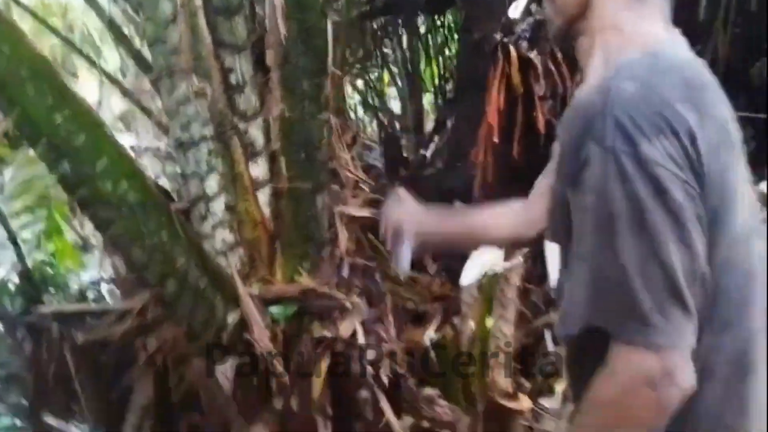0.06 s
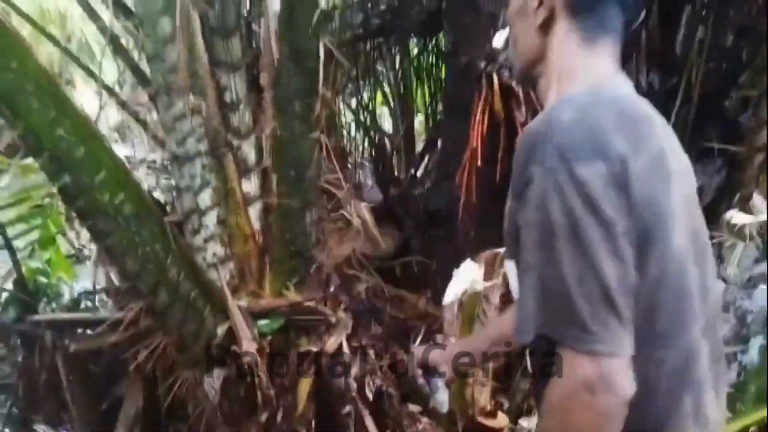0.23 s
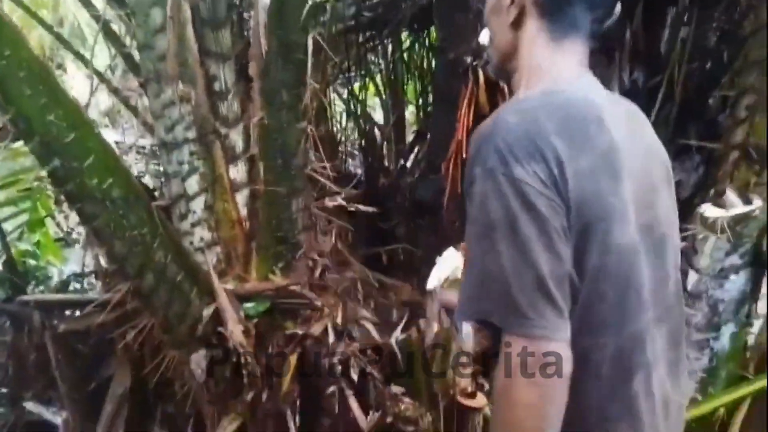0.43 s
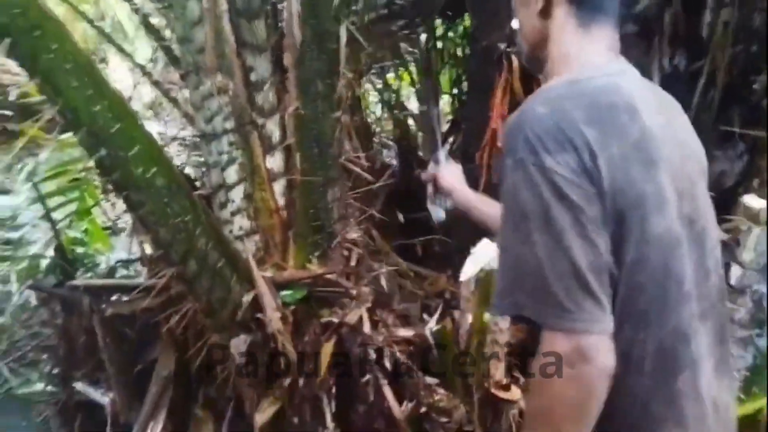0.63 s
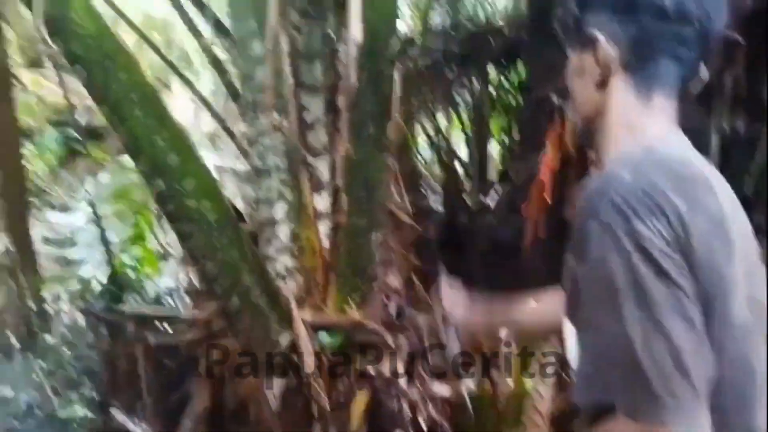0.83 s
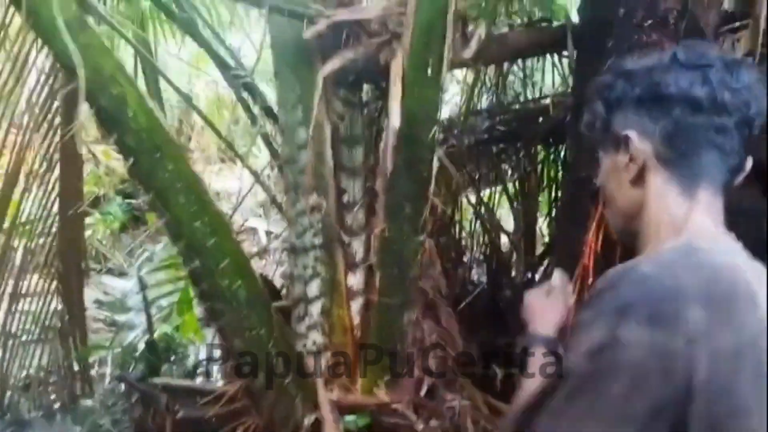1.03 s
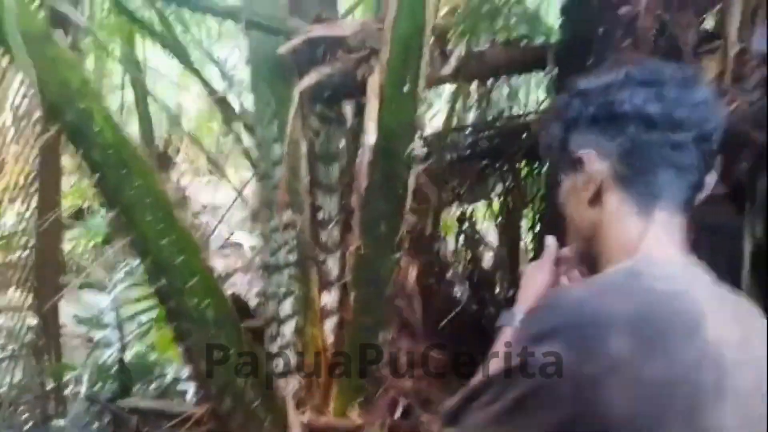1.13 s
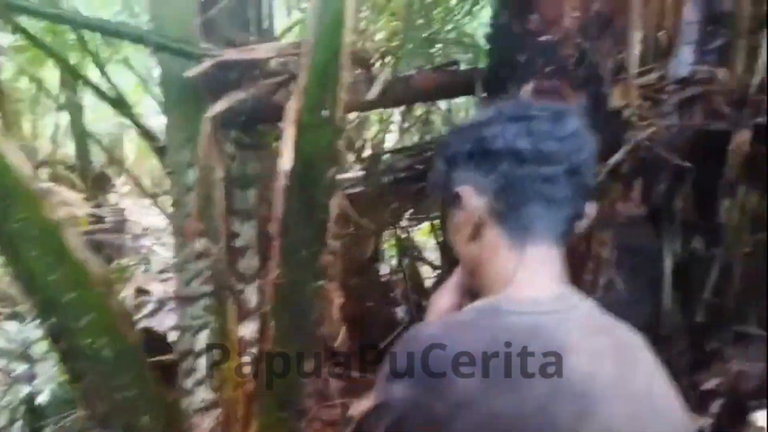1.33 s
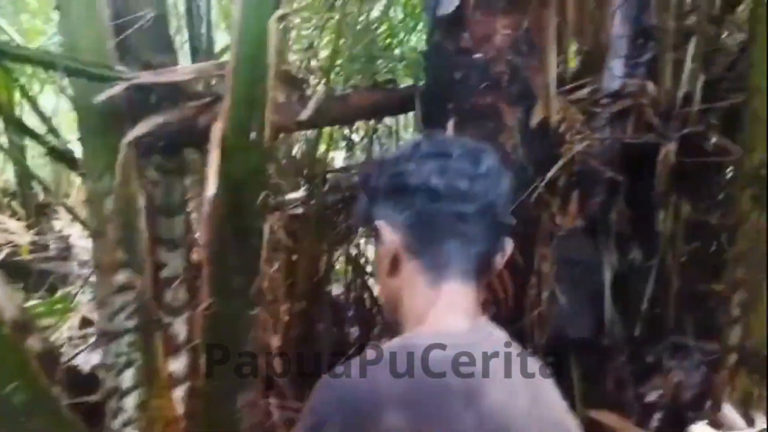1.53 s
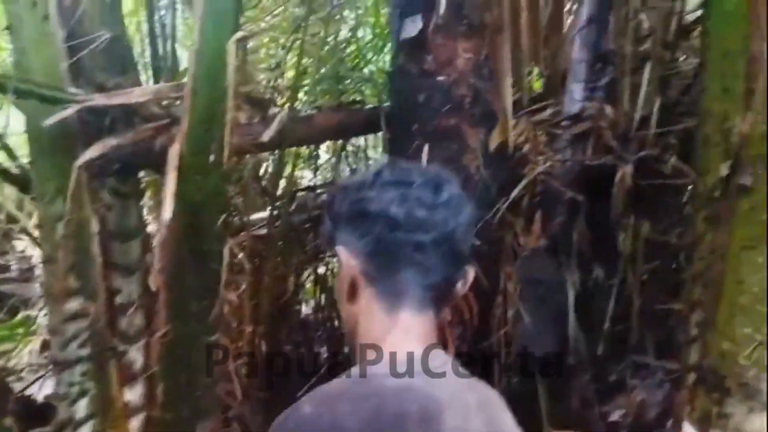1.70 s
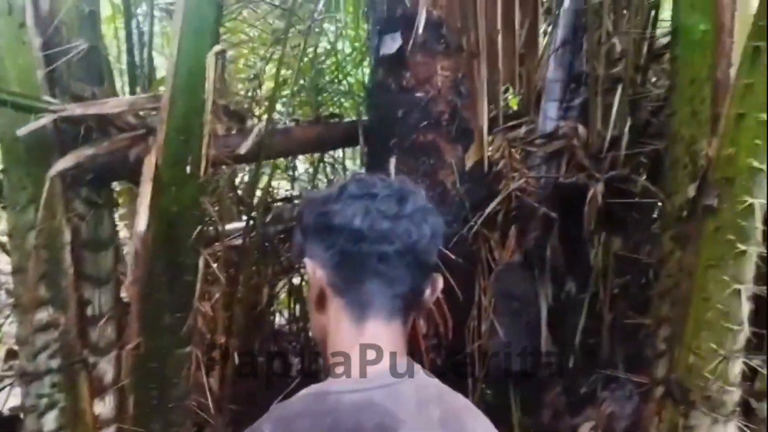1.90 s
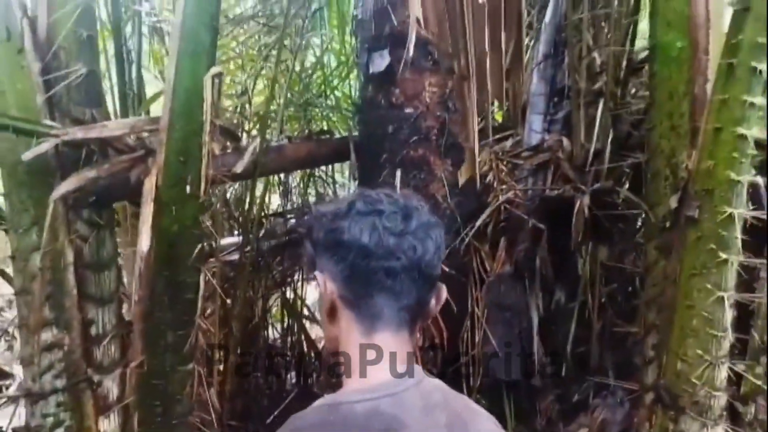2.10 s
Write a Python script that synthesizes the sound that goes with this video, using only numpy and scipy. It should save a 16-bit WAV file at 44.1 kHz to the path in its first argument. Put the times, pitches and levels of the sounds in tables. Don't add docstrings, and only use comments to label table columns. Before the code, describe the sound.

Machete chopping irregularly into a fibrous palm base, with sharp splintery cracks and hollow knocks outdoors

```python
import sys
import numpy as np
from scipy import signal
from scipy.fft import rfft, irfft, next_fast_len
from scipy.io import wavfile
from scipy.ndimage import uniform_filter1d

SR = 44100
rng = np.random.default_rng(int(sys.argv[2]) if len(sys.argv) > 2 else 0)


def int16_out(signal):
    q = np.round(np.clip(np.atleast_2d(signal).T, -1, 1) * 32767)
    wavfile.write(sys.argv[1], SR, q.astype(np.int16))


def gain_from_decibels(decibels):
    exponent = np.asarray(decibels, float) / 20
    return 10 ** exponent


N = 94815


def level(x):
    return x / np.sqrt(np.mean(x ** 2))


def shape(points, size):
    p = np.array(points, float)
    hz = np.arange(size // 2 + 1) * SR / size
    return np.interp(np.log(hz + 1), np.log(p[:, 0]), p[:, 1])


def colour(x, points):
    cepstrum = irfft(shape(points, size=4096) * np.log(10) / 20)
    cepstrum[1:2048] *= 2
    cepstrum[2049:] = 0
    return signal.fftconvolve(x, irfft(np.exp(rfft(cepstrum))))[:N]


def ring(x, hz, width_hz):
    hz = min(hz, 0.45 * SR)
    b, a = signal.iirpeak(hz, hz / width_hz, fs=SR)
    return signal.lfilter(b, a, x)


def fade(t, t60):
    return gain_from_decibels(-60 * np.maximum(t, 0) / max(t60, 0.003))


def add(out, at, x):
    i = int(at * SR)
    out[i:i + len(x)] += x[:N - i]


def walk(rate):
    hold = int(SR / rate)
    steps = np.repeat(rng.standard_normal(N // hold + 1), hold)
    return 1.26 * uniform_filter1d(uniform_filter1d(steps, hold), hold)[:N]


STREAK_DB = 6.5


def crackle(spread_db, patchy_db, mottle_db, size):
    click_db = spread_db * rng.exponential(size=N) + patchy_db * walk(300)
    x = rng.standard_normal(N) * gain_from_decibels(click_db)
    for frame, db in ((4 * size, STREAK_DB), (size, mottle_db)):
        hz, _, z = signal.stft(x, SR, nperseg=frame)
        field = uniform_filter1d(rng.standard_normal(z.shape), size=2, axis=1)
        field = uniform_filter1d(field, size=2, axis=0)
        treble = np.clip(hz / 5000, 0.4, 1)[:, None]
        z = z * gain_from_decibels(db * treble * field / field.std())
        x = signal.istft(z, nperseg=frame)[1][:N]
    return level(x)


# frequency [Hz], density [dB per Hz].
FOREST_COLOUR = [(15, -62), (25, 17.5), (277, 7.5), (1480, -4), (3430, 0.5), (5570, -5.5), (6560, -1.5),
                 (12200, -7.5), (16000, -13)]
FOREST_DB = -53


def forest():
    hush = level(colour(crackle(0.11, 0.4, 2.7, size=256), FOREST_COLOUR))
    return hush * gain_from_decibels(FOREST_DB - 3 + 1.1 * walk(12.1))


# time [s], level [dB], brightness [dB].
RUSTLE_COURSE = [(0, -40, -5), (0.039, -46, -4.5), (0.171, -52, -0.5), (0.201, -48, 11), (.45, -48.5, -0.5),
                 (.62, -42.5, -1), (.72, -45.5, -3.5), (.82, -59.5, -5), (.9, -49.5, 8), (.96, -52, 7.5),
                 (1.22, -53.5, -29), (1.3, -53.5, 2.5), (1.47, -55, 7), (1.598, -61, 3),
                 (1.651, -46.5, 0.5), (1.74, -76, 5), (1.95, -51.5, -3), (2.079, -60.5, -11)]
# frequency [Hz], density [dB per Hz].
LEAF_COLOUR = [(59, -45), (100, -54), (239, -8.5), (736, 0), (3470, 1), (5900, -15), (6560, -8.5),
               (14700, -9.5), (16000, -14.5)]
LEAF_DB = 1


def leaves():
    time, stir_db, bright_db = np.array(RUSTLE_COURSE).T
    t = np.arange(N) / SR
    x = level(colour(crackle(1.0, 1.36, 2.4, size=256), LEAF_COLOUR))
    tilt_db = np.interp(t, time, bright_db)

    def part(hz, kind):
        sos = signal.butter(3, hz, kind, fs=SR, output="sos")
        return signal.sosfilt(sos, x) * gain_from_decibels(1.32 * walk(30.37))

    woody = part(880, "low") * gain_from_decibels(1 - 0.32 * tilt_db)
    dull = part([1300, 5000], "band")
    bright = part(5030, "high") * gain_from_decibels(tilt_db)
    return (woody + dull + bright) * gain_from_decibels(LEAF_DB + np.interp(t, time, stir_db))


# start [s], peak level [dB], pitch [Hz], t60 [s].
SNAP_EVENTS = [(0.1893, -19, 12000, .012), (0.2103, -6.5, 10150, 0.008), (.241, -5.5, 8700, 0.02),
               (.246, -4.5, 8700, 0.034), (.290, -10.5, 4930, 0.016), (0.2953, -15, 6540, 0.012),
               (.3765, -9, 11800, 0.013), (0.3817, -6, 13000, 0.0097), (0.398, 0, 8260, 0.0054),
               (0.4016, -10.5, 7100, .015), (0.4013, -13, 9450, 0.0073), (0.4047, -15, 8750, 0.016),
               (.470, -26, 2940, 0.042), (0.614, -29.5, 3370, 0.057), (0.6754, -24, 1780, 0.081),
               (0.6956, -24, 1660, 0.034), (0.8457, -32.5, 8000, .012), (0.8846, -23, 3290, 0.029),
               (1.045, -8.5, 9000, 0.0086), (0.9717, -19, 11500, 0.011), (1.011, -7.5, 10000, 0.036),
               (1.2715, -31.5, 2360, 0.019), (1.324, -36.5, 3500, 0.084), (1.39, -29.5, 10800, 0.069),
               (1.651, -30.5, 2450, 0.028), (1.752, -32.5, 2850, 0.014), (1.779, -12.5, 2540, 0.016),
               (1.788, -3, 10500, 0.008), (2.089, -34, 5900, 0.027), (.462, -26, 2970, .03),
               (.495, -32, 3040, 0.011), (.528, -34.5, 3470, 0.011), (.73, -32, 2030, 0.025),
               (.846, -33.5, 1800, 0.014), (.858, -33.5, 3600, 0.058), (.891, -21.5, 3360, 0.026),
               (.8965, -28, 13000, .01), (.918, -28, 11000, .008), (.9235, -25, 5800, 0.027),
               (.959, -28, 2730, 0.02), (.9894, -12, 12000, .012), (.9905, -25, 2230, 0.0073),
               (1.46, -31, 6360, 0.013), (1.509, -38, 9600, 0.013), (1.518, -40, 2600, 0.035),
               (1.625, -40, 2870, .03), (1.159, -22.5, 2200, .04), (1.166, -18, 2000, .025),
               (2.134, -28.5, 4840, .02), (2.122, -35, 6000, .012)]
SNAP_DB, SNAP_ATTACK_S = -4.5, 0.00056
SNAP_WIDTH = 0.46


def snaps():
    out, t = np.zeros(N), np.arange(SR // 10) / SR
    for at, db, hz, t60 in SNAP_EVENTS:
        attack = np.minimum(t / SNAP_ATTACK_S, 1)
        burst = rng.standard_normal(len(t)) * attack * fade(t, t60)
        x = ring(ring(burst, hz, SNAP_WIDTH * hz), hz, SNAP_WIDTH * hz)
        add(out, at, gain_from_decibels(db + SNAP_DB) * x / np.abs(x).max())
    return out


# start [s], peak level [dB], hold [s], t60 [s].
CUT_EVENTS = [(0.191, -23.5, 0.0017, 0.067), (0.2089, -12, 0.023, 0.18), (0.233, -7.5, 0.005, 0.29),
              (0.282, -12.5, 0.0075, 0.039), (0.371, -15.5, 0.0021, 0.15), (0.393, -18, 0.0029, 0.33),
              (.885, -35, 0.0032, 0.048), (0.916, -31.5, 0.006, 0.052), (0.973, -23.5, 0.0019, 0.026),
              (0.9913, -16.5, .011, 0.22), (.981, -25.5, 0.0076, .05), (.8155, -32, .003, 0.027),
              (0.845, -31, .003, .03), (.8965, -32, 0.0026, .03), (1.75, -35, 0.0027, .02),
              (1.001, -9, 0.011, 0.33), (1.02, -16, 0.0046, 0.16), (1.0902, -10, 0.0046, 0.077),
              (1.1578, -13.5, 0.011, 0.027), (1.773, -8, 0.014, 0.18), (1.79, -10, 0.015, 0.25),
              (1.815, -12, 0.033, 0.075), (2.123, -34.5, 0.0072, .1), (2.133, -28.5, 0.017, .15)]
# frequency [Hz], density [dB per Hz].
TEAR_COLOUR = [(100, -39), (260, -3), (1000, -6), (3000, -4), (5000, -9.5), (6500, -7.5), (9000, -11),
               (14500, -3), (16000, -12.5)]
# frequency [Hz], width [Hz], level [dB].
BLADE_MODES = [(6560, 164, 7), (7650, 120, -19), (8860, 370, 12.5), (9800, 500, 5.5), (12000, 53, -17),
               (14000, 180, 4), (14800, 97, -11), (15400, 30, -11)]
CUT_DB, CUT_ATTACK_S, BLADE_DB = -13.5, 0.0016, -8.5
SHED_DB, SHED_T60_S = -16, 0.55


def cuts():
    power, t = np.zeros(N), np.arange(SR // 2) / SR
    attack = np.minimum(t / CUT_ATTACK_S, 1)
    debris = gain_from_decibels(SHED_DB) * fade(t, SHED_T60_S)
    for at, db, hold, t60 in CUT_EVENTS:
        body = fade(t - hold, t60) ** 2 + debris ** 2
        add(power, at, gain_from_decibels(db + CUT_DB) ** 2 * attack ** 2 * body)
    tear = crackle(0.48, 0.65, 2.83, size=256)
    steel = sum(gain_from_decibels(db) * ring(tear, hz, width) for hz, width, db in BLADE_MODES)
    return np.sqrt(power) * (level(colour(tear, TEAR_COLOUR)) + gain_from_decibels(BLADE_DB) * level(steel))


# start [s], peak level [dB], pitch [Hz], t60 [s].
KNOCK_EVENTS = [(0.194, -36.5, 1150, 0.026), (0.2115, -19, 489, 0.1), (0.219, -13.5, 1034, 0.037),
                (.232, -22.5, 253, 0.15), (.243, -17.5, 1070, 0.022), (.252, -20.5, 650, 0.022),
                (.293, -23.5, 593, 0.09), (.401, -26, 304, 0.06), (.565, -32, 1056, 0.033),
                (0.615, -31.5, 867, 0.043), (0.6529, -26, 527, 0.046), (0.6743, -25.5, 651, 0.061),
                (0.6961, -20.5, 646, 0.04), (.731, -38.5, 754, 0.17), (0.781, -35.5, 1013, 0.02),
                (.922, -37, 1000, 0.027), (.992, -38, 636, 0.17), (1.011, -16, 725, 0.05),
                (1.049, -23.5, 258.4, 0.08), (1.047, -23, 522, 0.077), (1.0931, -15.5, 691, 0.02),
                (1.096, -26, 272, 0.14), (1.169, -15, 235, 0.044), (1.014, -29, 218, 0.04),
                (1.778, -18.5, 1495, 0.036), (1.793, -15, 256.7, 0.078), (1.793, -16, 550, 0.05),
                (1.839, -24, 680, 0.039), (1.85, -27, 312, 0.031), (2.126, -41.5, 824, 0.038),
                (.464, -45, 262, .08), (.464, -34, 1074, .04), (0.546, -36.5, 1540, 0.025),
                (0.591, -40, 990, 0.031), (.612, -37, 387, 0.069), (.632, -40.5, 284, 0.063),
                (.652, -26.5, 1094, 0.034), (.675, -23.5, 1000, 0.022), (.748, -38, 746, 0.034),
                (0.869, -47, 790, .03), (1.014, -19, 1090, 0.026), (1.028, -22.5, 678, .04),
                (1.09, -30, 1420, 0.033), (1.101, -22, 497, 0.056), (1.655, -53, 285, 0.046),
                (1.777, -22, 279, 0.057), (1.777, -26, 523, .04), (1.803, -24, 388, 0.037),
                (1.817, -22, 720, 0.033), (1.187, -30, 263, 0.073)]
# ratio
# to the main mode, level [dB].
STEM_MODES = [(.8, -24), (1.3, -8), (1.6, -5), (2, -8), (2.5, -9), (3.1, -10), (4, -13)]
KNOCK_DB, KNOCK_PUSH_S = -2, 0.0062


def knocks():
    out, t = np.zeros(N), np.arange(SR // 4) / SR
    for at, db, hz, t60 in KNOCK_EVENTS:
        def mode(ratio):
            onset = np.minimum(t * hz * 1.5, 1)
            return fade(t, t60 / max(ratio, 1)) * onset * np.sin(2 * np.pi * hz * ratio * t)

        push = rng.standard_normal(len(t)) * fade(t, KNOCK_PUSH_S) / np.sqrt(KNOCK_PUSH_S * SR / 14)
        rest = sum(gain_from_decibels(g) * mode(r * (1 + 0.075 * rng.standard_normal())) for r, g in STEM_MODES)
        rough = signal.fftconvolve(rest, push)[:len(t)]
        x = mode(0.99) + 0.63 * rest + 0.6 * rough
        add(out, at, gain_from_decibels(db + KNOCK_DB) * x / np.abs(x).max())
    return out


def scatter(x, t60):
    t = np.arange(SR // 2) / SR
    h = rng.standard_normal(len(t)) * fade(t, t60)
    return signal.fftconvolve(x, h / np.sqrt(np.sum(h ** 2)))[:N]


# frequency [Hz], side minus mid [dB].
STEREO_WIDTH = [(40, -3), (90, -11), (180, -28), (450, -14), (1400, -3), (3000, 0), (6000, -2),
                (14000, -6.5)]
# frequency [Hz], left minus right [dB].
STEREO_LEAN = [(1300, 0), (2400, -2), (4400, -2), (8000, .5), (14000, -2)]
ECHO_DB, ECHO_T60_S, STEM_ECHO_DB = -7, 0.24, -12
SPREAD_T60_S = 0.026


def scene():
    splinters, stem, blade = snaps(), knocks(), cuts()
    echo = gain_from_decibels(ECHO_DB) * scatter(blade + splinters + gain_from_decibels(STEM_ECHO_DB) * stem, ECHO_T60_S)
    mid = forest() + leaves() + splinters + blade + stem + echo
    stem_side = signal.hilbert(stem).imag
    side = forest() + leaves() + scatter(splinters, SPREAD_T60_S) + cuts() + stem_side
    size = 2 * next_fast_len(N // 2 + 1)
    side = irfft(rfft(side, size) * gain_from_decibels(shape(STEREO_WIDTH, size=size)))[:N]
    lean = gain_from_decibels(shape(STEREO_LEAN, size=size) / 2)
    pair = rfft(np.array([mid + side, mid - side]), size)
    return irfft(pair * np.array([lean, 1 / lean]))[:, :N]


# centre [Hz], share of time silent.
SILENT_BANDS = [(4300, .2), (5550, .55), (7500, .5), (8300, .2), (9500, .1), (10400, .35), (10900, .15),
                (11400, .6), (13300, .12), (14200, .15)]


def dropouts(x):
    hz, t, z = signal.stft(x, SR, nperseg=512)
    at = np.minimum((t * SR).astype(int), N - 1)
    for centre_hz, share in SILENT_BANDS:
        luck, drift = walk(20)[at], walk(8)[at]
        band = np.abs(hz[:, None] - centre_hz * (1 + 0.012 * drift)) < 230
        silent = band & (luck < np.quantile(luck, share))
        z = z * np.where(silent, gain_from_decibels(-45), 1)
    return signal.istft(z, nperseg=512)[1][:, :N]


def band_limit(x):
    return signal.sosfilt(signal.butter(12, 16000, fs=SR, output="sos"), x)


MIC_LOW_HZ, TOP_HZ = 115.5, 15350


def record(dry):
    low_cut = signal.butter(2, MIC_LOW_HZ, "high", fs=SR, output="sos")
    top_cut = signal.ellip(8, 0.2, 70, TOP_HZ, fs=SR, output="sos")
    x = signal.sosfilt(low_cut, dropouts(dry))
    x = signal.sosfilt(top_cut, x)
    return band_limit(x)


dry = scene()
out = record(dry)
int16_out(out)
```